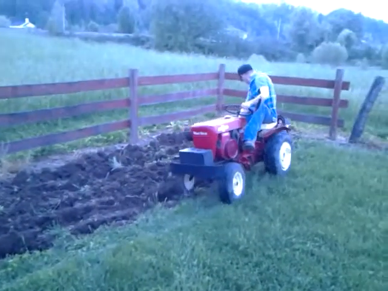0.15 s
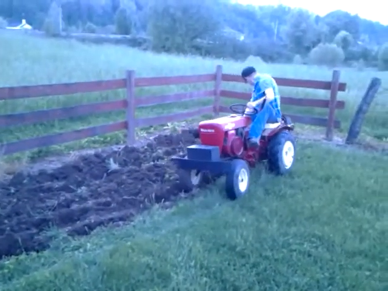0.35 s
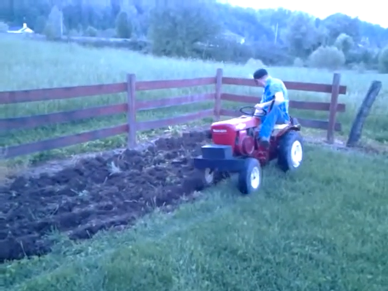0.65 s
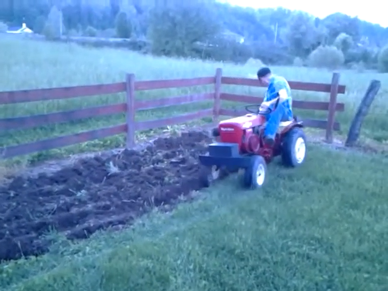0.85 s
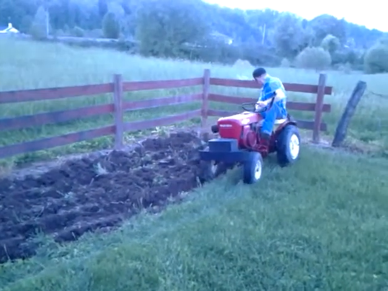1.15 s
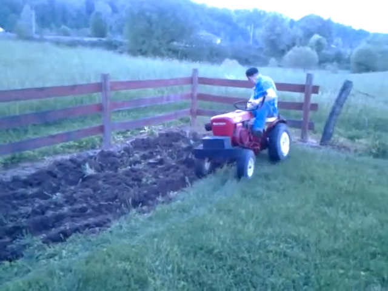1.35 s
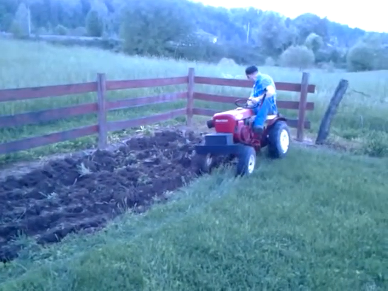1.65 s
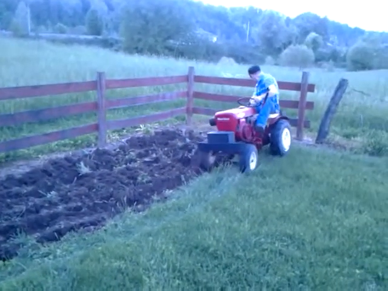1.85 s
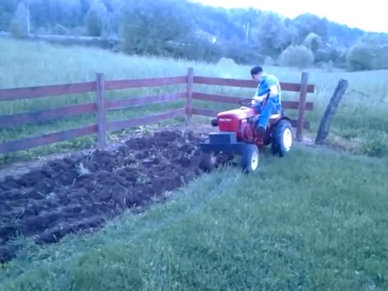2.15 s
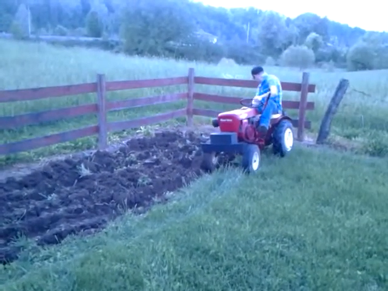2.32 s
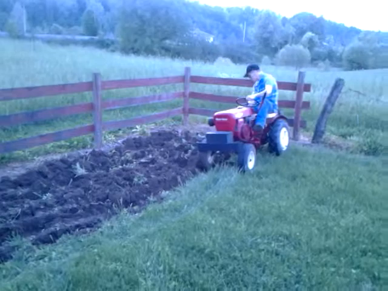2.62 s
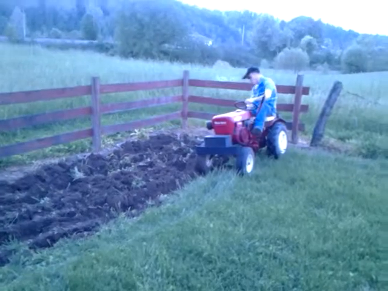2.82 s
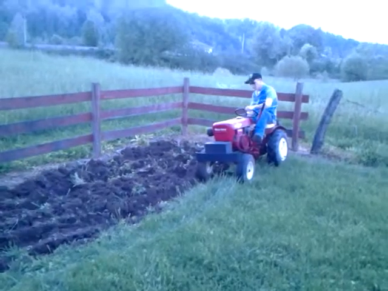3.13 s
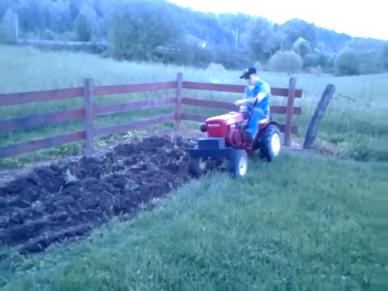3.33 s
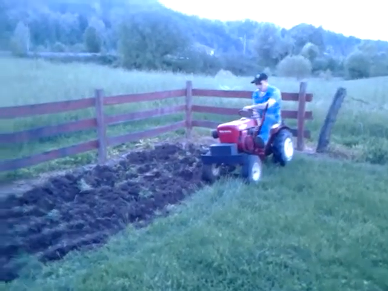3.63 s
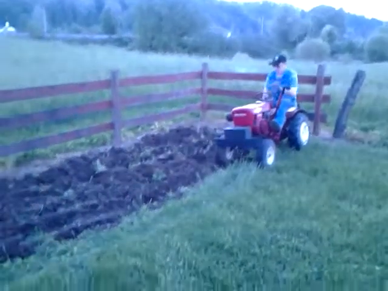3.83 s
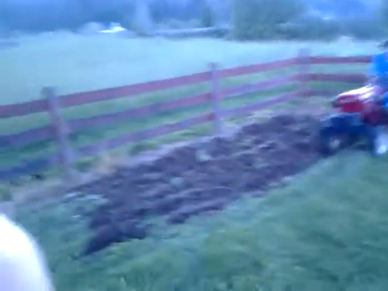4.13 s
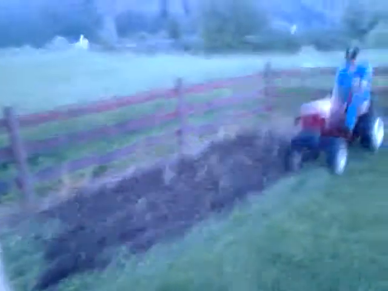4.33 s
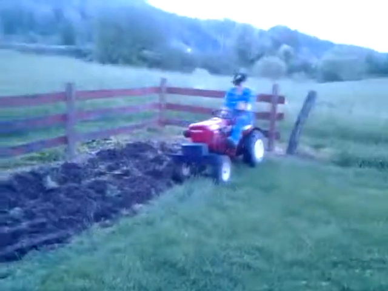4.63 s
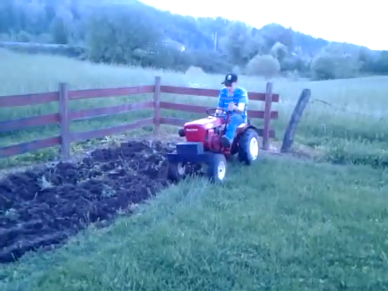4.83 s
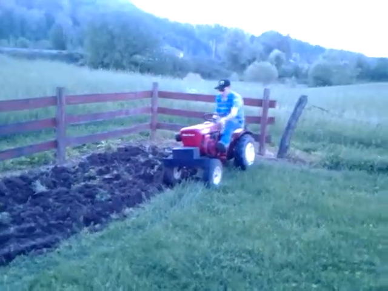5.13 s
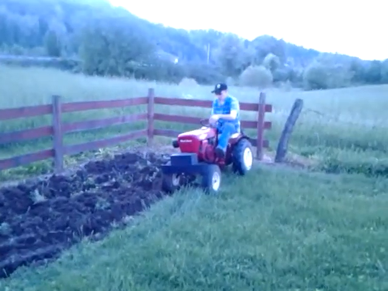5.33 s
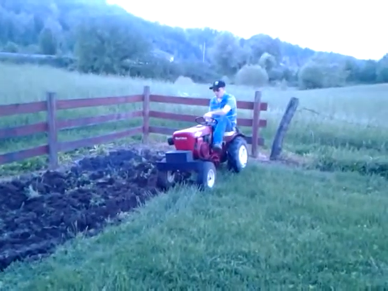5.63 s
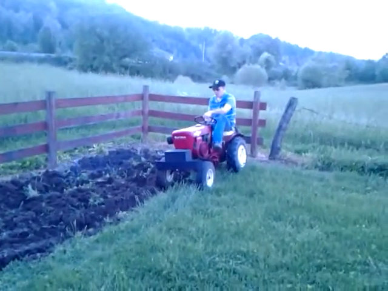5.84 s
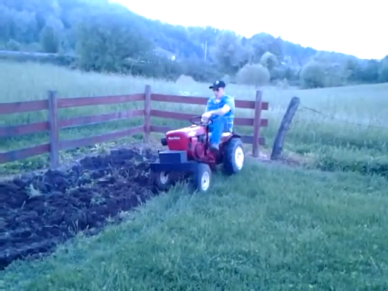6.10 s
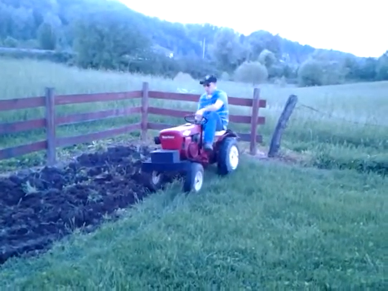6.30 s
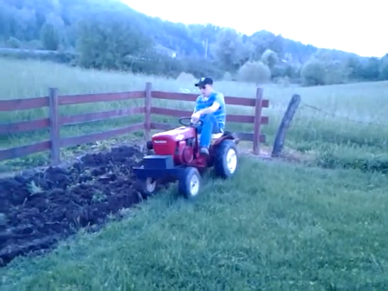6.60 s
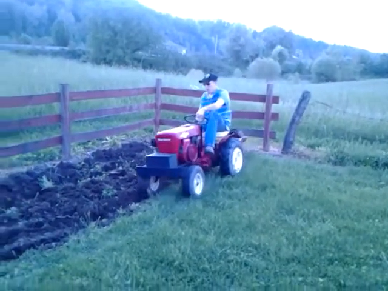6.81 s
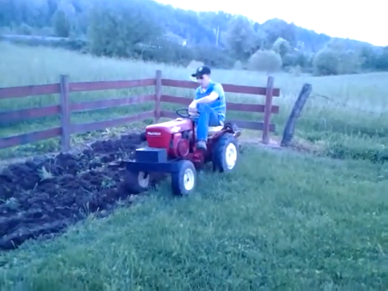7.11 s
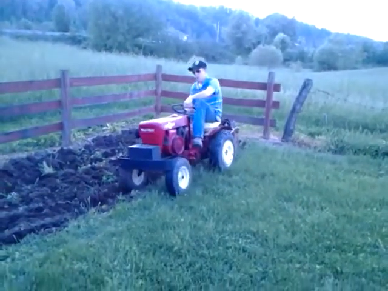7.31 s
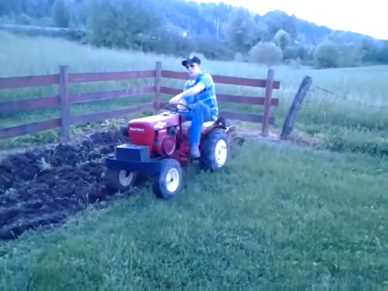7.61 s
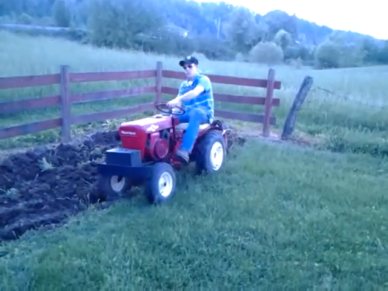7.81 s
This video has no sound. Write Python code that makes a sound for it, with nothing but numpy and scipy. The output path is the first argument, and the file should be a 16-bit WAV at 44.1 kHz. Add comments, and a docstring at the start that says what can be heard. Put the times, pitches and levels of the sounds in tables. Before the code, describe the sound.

Harsh rapid exhaust puffs and gear clatter from a small tractor outdoors; midway the tone is cupped, dips, surges once and drops to faint chugging.

```python
"""Small tractor at the plow

A small single-cylinder tractor works a plow in a field, some metres from a hand-held microphone.
Each firing rings the pipe in a low thump and sends two sharp noise puffs through the muffler outlet.
Hood and gears clatter as small random knocks on resonances, with noise hiss and crank-locked tones.
Midway a hand cups the microphone, heard as a moving filter; then the load comes off and the machine
grows much quieter. Low noise makes the wind, and a few damped rings the stray knocks."""
import sys
import numpy as np
from scipy import signal
from scipy.fft import rfft, irfft
from scipy.io import wavfile
from scipy.ndimage import uniform_filter1d

SR = 44100
rng = np.random.default_rng(int(sys.argv[2]) if len(sys.argv) > 2 else 0)


def output_pcm(signal):
    """Save a mono or channel-first signal as 16-bit PCM at the path in sys.argv[1].

    Samples are clipped to [-1, 1] before scaling.
    """
    pcm = np.clip(np.atleast_2d(signal).T, -1, 1) * 32767
    wavfile.write(sys.argv[1], SR, np.round(pcm).astype(np.int16))


def rack_gain(trim_db):
    """Turn a fader trim in dB into the linear factor to multiply a signal by."""
    fader = np.asarray(trim_db, float)
    return 10 ** (fader / 20)


N = 351036

# Engine speed. Each row: time in seconds, firings a second.
ENGINE_SPEED = [(0.0, 25.423), (0.75, 25.51), (1.0, 25.372), (1.75, 25.748), (2.25, 26.365), (3.25, 25.792),
                (3.5, 26.285), (3.75, 25.902), (4.0, 26.073), (4.5, 25.456), (5.125, 23.363),
                (5.375, 23.526), (5.625, 26.975), (5.875, 28.664), (6.0, 27.521), (6.75, 28.346),
                (7.5, 27.605), (7.96, 28.148)]


def evened(x):
    """Scales to rms 1."""
    return x / np.sqrt(np.mean(x ** 2) + 1e-20)


def curve(rows, column):
    """One column of a table, sample by sample."""
    table = np.array(rows)
    return np.interp(np.arange(N) / SR, table[:, 0], table[:, column])


def ramp(start, end):
    """Goes from 0 to 1 between two times in seconds."""
    return np.clip((np.arange(N) / SR - start) / (end - start), 0, 1)


def bump(s, half):
    """Bell of height 1 round a time, down to 1/e half seconds away."""
    return np.exp(-((np.arange(N) / SR - s) / half) ** 2)


def wander():
    """Slow random drift in dB, new at every call, so that no layer stays quite even."""
    wander_db, wander_s = 1.04, 0.052  # rms drift, first smoothing length
    smooth = uniform_filter1d(rng.standard_normal(N), round(wander_s * SR))
    return wander_db * evened(uniform_filter1d(smooth, 2000))


def resonate(x, hz, width):
    """Band-pass of gain 1 at its centre."""
    return signal.lfilter(*signal.iirpeak(hz, hz / width, SR), x)


def coloured(points):
    """Noise of rms 1 with the spectrum given as (Hz, dB) points."""
    f, db = np.transpose(points)
    hz = np.fft.rfftfreq(N, 1 / SR)
    gain = rack_gain(np.interp(np.log(hz + 1), np.log(f), db))
    return evened(irfft(rfft(rng.standard_normal(N)) * gain, N))


def burst(since, rise, fall):
    """Envelope that rises and dies away after each firing (time constants in seconds)."""
    return (1 - np.exp(-since / rise)) * np.exp(-since / fall)


def jet(since, start, length):
    """Envelope of one jet: opens fast, swells, and is cut off as the pressure falls."""
    share = np.clip((since - start) / length, 0, 1)
    return np.sin(np.pi * share ** .45) ** 1.5


def ring(at, modes, lead_s, back_s, back_db, spread_db):
    """A pressure pulse runs ahead of each firing's puff, rings the modes and returns once as an echo."""
    t, blows = np.arange(8000) / SR, np.zeros(N)
    blows[at - round(lead_s * SR)] = rack_gain(spread_db * rng.standard_normal(len(at)))
    tone = sum(rack_gain(db - 60 * t / t60) * np.sin(2 * np.pi * hz * t) for hz, db, t60 in modes)
    back = round(back_s * SR)
    tone[back:] += rack_gain(back_db) * tone[:-back]
    return evened(signal.oaconvolve(blows, tone)[:N])


def rattle(modes, since, shake, fall, knocks_per_s, spread_db):
    """Many small random knocks ring the metal, hardest just after a firing."""
    strength = rack_gain(spread_db * np.minimum(rng.exponential(1, N), 4))
    hits = (rng.random(N) < knocks_per_s / SR) * strength * rng.standard_normal(N)
    shaken = hits * (1 + shake * burst(since, 0.00022, fall))
    return evened(sum(rack_gain(db) * evened(resonate(shaken, hz, width)) for hz, width, db in modes))


def firings():
    """The turning engine: sample of each firing, and for every sample its firing and seconds since."""
    first_turn = .7823  # share of a firing period before the first firing
    number = np.floor(np.cumsum(curve(ENGINE_SPEED, column=1)) / SR + 1 - first_turn).astype(int)
    at = np.r_[0, np.flatnonzero(np.diff(number)) + 1]
    since = (np.arange(N) - at[number]) / SR
    since += (number == 0) * (1 - first_turn) / ENGINE_SPEED[0][1]  # the sound starts within a period
    return at[1:], number, since


def exhaust_thump(at, sag):
    """Each firing's pressure pulse rings the exhaust pipe and muffler shell over a low noise wash."""
    # Pipe and muffler shell. Each row: pitch in Hz, level in dB, t60 in seconds.
    pipe = [(149.5, -3.5, 0.059), (228, 6, 0.045), (292, -4, 0.096), (380, 2, 0.053)]
    # Two further notes rung by each firing, a low one and one near 530 Hz. Each row: pitch in Hz, level in dB,
    # t60 in seconds.
    outer = [(100, 0, 0.05), (532, -8, .06)]
    # Low engine wash. Each row: frequency in Hz, density in dB per Hz.
    wash = [(80, -16), (110, -9), (150, -5), (250, 0), (390, -2), (470, -9), (600, -20)]
    outer_db = -6 - 25 * ramp(5.1, 5.15)  # the outer notes drop back as the load comes off
    wash_db = -7.5 + 8 * sag  # the wash grows as the engine sags
    thump = ring(at, pipe, 0.0016, 0.01082, -12.5, 0.46)
    thump += rack_gain(outer_db) * ring(at, outer, 0.004, 0.013, -30, 1)
    # the muffler holds back the upper pipe tones
    thump = signal.sosfilt(signal.butter(3, 430, fs=SR, output="sos"), thump)
    return evened(thump + rack_gain(wash_db) * coloured(wash))


def muffler_puffs(number, since, free):
    """Two jets of gas a firing and a longer hiss; every jet excites the outlet resonances differently."""
    # Muffler outlet. Each row: centre in Hz, resonator width in Hz, dB under load, dB running free.
    outlet = [(3030, 910, -5, -37.5), (3734, 640, 4, 1.5), (4500, 1120, -7, 0), (5500, 340, -11.5, -40),
              (7000, 1170, 0.5, 0.5), (8170, 2600, -12, -5.5), (10040, 1830, -1.5, -4.5),
              (12700, 2200, -7.5, -1.5), (15000, 3000, -40, -2)]
    # Brightness of the puffs. Each row: time in seconds, tilt in dB an octave.
    tilt = [(0, -0.5), (1.2, 1), (3, 3.5), (3.6, -3.5), (4.7, 3), (5.3, 10), (6.2, -0.5), (7.96, 4)]
    firing_count = number[-1] + 1
    chance = np.clip(rng.standard_normal((firing_count, 2, len(outlet) + 1)), -1.6, 1.6)
    size = rack_gain(1.3 * chance[:, :, :1] + 3.1 * chance[:, :, 1:])  # whole jet, then each band
    second_s = .0074 + .0004 * rng.standard_normal(firing_count)[number]
    first = jet(since, 0, .0058)
    second = rack_gain(-0.82) * jet(since, second_s, 0.0049)
    # hiss trails longer running free, and ducks between the cracking jets as the engine picks up
    tail_db = -3.5 + 2.5 * free - 6.5 * bump(5.48, 0.23)
    tail = rack_gain(tail_db) * (burst(since, 0.0077, 0.016) + 0.041)
    brightness_db = curve(tilt, column=1) + 2 * wander()
    top_hz = 11300  # the tilt grows no further above this
    out = np.zeros(N)
    for k, (hz, width, load_db, free_db) in enumerate(outlet):
        envelope = first * size[number, 0, k] + second * size[number, 1, k] + tail * (hz / 7000) ** -.35
        jets = envelope * rng.standard_normal(N)
        rung = resonate(resonate(jets, hz, width), hz, width)  # twice: dark valleys between the bands
        band_db = load_db + free * (free_db - load_db) + brightness_db * np.log2(min(hz, top_hz) / 7000)
        out += rack_gain(band_db) * evened(rung)
    wide = (first + second + tail) * coloured([(450, -23), (900, -15), (2000, -22), (16000, -9)])
    return evened(evened(out) + rack_gain(-9.0 - 3 * free) * evened(wide))  # less broad noise running free


def crank_tones(waver_db):
    """Sines locked to the crank, each swelling and fading on its own."""
    # Tones of the turning engine in the hood. Each row: multiple of the firing rate, level in dB.
    multiples = [(21, -8.5), (23, -1), (24, 4.5), (26, -9), (27, -27), (29, 2), (30, -23), (31, -0.5),
                 (33, 0.5), (34, -3), (36, -11), (37, 2), (38, 3), (40, -10), (41, -6)]
    turns, out = np.cumsum(curve(ENGINE_SPEED, column=1)) / SR, np.zeros(N)
    for multiple, db in multiples:
        waver = np.interp(np.arange(N), np.linspace(0, N, 40), rng.standard_normal(40))
        out += rack_gain(db + waver_db * waver) * np.sin(2 * np.pi * (multiple * turns + rng.random()))
    return evened(out)


def hood_clatter(at, since, sag, free):
    """Firings knock the shell and shake loose panels, and the turning crank hums in the sheet metal."""
    # Shell struck by each firing. Each row: pitch in Hz, level in dB, t60 in seconds.
    shell = [(664, -10.5, 0.055), (846, 2, .014), (1070, -19, 0.0037)]
    # Loose hood panels. Each row: centre in Hz, width in Hz, level in dB.
    panels = [(674, 28, -2), (766, 51, 8.5), (875, 45, 9.5), (990, 33, -1.5), (955, 98, -22)]
    hood = rack_gain(3 * free + 3 * sag) * ring(at, shell, 0.001603, 0.01, -0.95, 1.75)
    hood += rack_gain(2) * rattle(panels, since, 0.48, 0.02, 1500, 0.55)
    # the panels radiate little bass
    hood = signal.sosfilt(signal.butter(4, 560, "high", fs=SR, output="sos"), hood)
    # the tones give way to knocks as the speed sags, and stay weak running free
    hood += rack_gain(-10 * sag - 6 * free) * crank_tones(3.7)
    return evened(hood)


def firing_beat(since):
    """Lift of the gear and drive hiss by each firing."""
    return 1 + 0.57 * burst(since, 0.00076, 0.006)


def gear_clatter(since, sag, free):
    """Teeth knock in the gear case over hiss, in separate beats as the speed sags."""
    # Gear case. Each row: centre in Hz, width in Hz, level in dB.
    case = [(1072, 540, 6.5), (1352, 69, 2), (1620, 110, -1.5), (1791, 46, 10), (2090, 78, -1.5),
            (2434, 105, 11), (2450, 130, -15)]
    # Hiss of the gear case. Each row: frequency in Hz, density in dB per Hz.
    case_hiss = [(300, -91), (600, -7.5), (1500, 4.5), (2600, 5.5), (3300, -17), (8000, -53), (16000, -17)]
    gears = rattle(case, since, 0.91, 0.015, 3000, 2.85)
    gears += rack_gain(-1.5) * firing_beat(since) * coloured(case_hiss)
    gears += free * rack_gain(0.67) * resonate(gears, 1460, 400)  # the case rings lower running free
    return evened(gears * (1 + 1.97 * sag * burst(since, 0.0015, 0.0097)))


def drive_grind(since):
    """Bright grinding of the drive: dense knocks on high resonances over hiss."""
    # Drive resonances. Each row: centre in Hz, width in Hz, level in dB.
    drive_modes = [(3080, 470, -4.5), (3430, 180, 1.5), (3620, 99, -2), (4440, 48, -2.5), (4770, 81, -2),
                   (5274, 470, -0.5), (6000, 65, -4.5), (6950, 3200, -1)]
    # Hiss of the drive. Each row: frequency in Hz, density in dB per Hz.
    drive_hiss = [(600, -20), (1500, -12.5), (4000, -7.5), (8000, -21.5), (12000, -15.5), (16000, -26)]
    drive = rattle(drive_modes, since, 1.0, 0.0049, 4000, 2.9)
    return evened(drive + rack_gain(-3.0) * firing_beat(since) * coloured(drive_hiss))


def wind():
    """Air turbulence at the microphone: low noise with gusts and slow random drift."""
    # Wind in the lulls. Each row: time in seconds, level in dB.
    lulls = [(0, -62), (2.5, -64), (4.3, -75), (5.6, -63), (6.3, -77), (7.96, -78)]
    # Gusts. Each row: time in seconds, dB over the lull.
    gusts = [(.1, 8), (.4, 10), (.93, 6), (2.28, 6), (2.64, 8), (3.04, 8), (3.81, 8), (5.61, 7), (6.94, 12)]
    drift_db = 2.4 * evened(uniform_filter1d(rng.standard_normal(N), 3500))
    gust_db = sum(db * bump(s, .09) for s, db in gusts)
    rumble = coloured([(15, -4), (30, 4), (75, 4), (130, 1), (200, -39)])
    return rack_gain(curve(lulls, column=1) + gust_db + drift_db) * rumble


def cupped_hand(x):
    """The hand's cavity lifts one moving band, shades the treble above it and alters the very top."""
    # Hand over the microphone. Each row: time in seconds, cavity in Hz, cavity lift in dB,
    # shadow above it in dB, highest treble in dB.
    hand = [(3.0, 7940, 0, -10, 10.5), (3.2, 7000, 6.5, -6, 2), (3.4, 5500, 9.5, -11, 4),
            (3.55, 4500, 5.5, -16, -0.5), (3.9, 5750, 6.5, -4, 4), (4.1, 5350, 7, 1, 0),
            (4.55, 5500, 8, -5.5, -6), (4.8, 4060, 9, -14.5, -2), (4.95, 4500, 12.5, -8.5, -4),
            (5.1, 4060, 7.5, -10, -4), (5.35, 4500, 2, -14.5, -8.5), (5.85, 4500, 2, -15, 0)]
    top_hz = 11300  # where the highest treble starts
    hz, t, z = signal.stft(x, SR, nperseg=512, noverlap=384)
    s, *columns = np.transpose(hand)
    cavity_hz, lift_db, shadow_db, top_db = (np.interp(t, s, c) for c in columns)
    near = np.clip(np.minimum(t - s[0], s[-1] - t) / .15 + 1, 0, 1)  # the hand comes and goes
    octaves = np.log2((hz[:, None] + 1) / cavity_hz)
    gain_db = lift_db * np.exp(-(octaves / 0.44) ** 2)
    gain_db += shadow_db * np.exp(-((octaves - .85) / 0.75) ** 2)
    gain_db += top_db * np.clip(np.log2((hz[:, None] + 1) / top_hz) / 0.19 + .5, 0, 1)
    return signal.istft(z * rack_gain(near * gain_db), SR, nperseg=512, noverlap=384)[1][:, :N]


def stray_knocks():
    """Knocks near the microphone, each one quickly damped ring."""
    # Each row: start in seconds, starting level in dB, pitch in Hz, t60 in seconds.
    strays = [(3.558, -1, 3770, 0.011), (3.751, -2, 5560, 0.016), (4.645, -3.5, 5200, 0.0093),
              (6.915, -36, 232, .06), (7.447, -30, 2900, 0.003), (7.827, -31, 2500, 0.004)]
    out, t = np.zeros(N), np.arange(4000) / SR
    for s, db, hz, t60 in strays:
        out[round(s * SR):][:len(t)] += rack_gain(db - 60 * t / t60) * np.sin(2 * np.pi * hz * t)
    return out


def scene():
    """Exhaust, hood, gears and drive follow the levels, the load and the engine speed."""
    # Levels at the microphone. Each row: time in seconds, engine body in dB, muffler puffs in dB,
    # bright grinding of the drive in dB, gear clatter in dB over the body.
    work = [(0, -27.5, -18, -36, 3.5), (.4, -27, -19.5, -27, 5.5), (1.1, -26, -17, -35, 2.5),
            (1.6, -29, -18.5, -33, 3.5), (2, -26, -18, -31, 0.5), (2.8, -23.5, -19, -24, 1.5),
            (3.2, -24.5, -21, -23.5, 1.5), (3.7, -24, -21, -18, -0.5), (4.2, -25, -28.5, -21, 0.5),
            (4.6, -22, -19.5, -21, 0.5), (4.72, -25.5, -33, -26.5, 0.5), (4.84, -25, -47, -39.5, -6),
            (4.93, -25, -30, -21, 2), (5.05, -26, -37, -46.5, -8.5), (5.2, -29.5, -46, -43, -18),
            (5.3, -34, -28, -66, -12), (5.38, -38.5, -30, -66, -12), (5.46, -27, -20.5, -60, -10.5),
            (5.6, -22.5, -20, -55, -8.5), (5.75, -32.5, -31, -59, -8.5), (6, -40, -44, -69, -7.5),
            (6.9, -43, -47, -56, -9.5), (7.3, -48, -45, -60, -6.5), (7.96, -49, -43.5, -57, -7)]
    # Exhaust thump. Each row: time in seconds, dB over the body.
    thump_levels = [(0, -10), (2.4, -8.5), (4.6, -11.5), (5.12, -8.5), (5.42, -5), (6, -1.5), (7.5, 0),
                    (7.96, 1)]
    at, number, since = firings()
    free = ramp(4.3, 5.3)  # the load comes off the engine
    sag = np.clip((25.35 - curve(ENGINE_SPEED, column=1)) / .5, 0, 1)  # full half a firing a second below
    body_db = curve(work, column=1)
    thump_gain = rack_gain(body_db + curve(thump_levels, column=1) + wander())
    gear_gain = rack_gain(body_db + curve(work, column=4) + wander())
    hood_gain, puff_gain, grind_gain = (rack_gain(curve(work, column=k) + wander()) for k in (1, 2, 3))
    mix = thump_gain * exhaust_thump(at, sag)
    mix += puff_gain * muffler_puffs(number, since, free)
    mix += hood_gain * hood_clatter(at, since, sag, free)
    mix += gear_gain * gear_clatter(since, sag, free)
    mix += grind_gain * drive_grind(since)
    return (mix + stray_knocks())[None]


def low_pass(x):
    """Removes everything above the highest recorded frequency."""
    return signal.sosfilt(signal.butter(12, 16970, fs=SR, output="sos"), x)


def record(dry):
    """A hand cups the microphone, which cuts bass, picks up wind, rounds peaks and ends near 16 kHz."""
    cupped = cupped_hand(dry)
    thin = signal.sosfilt(signal.butter(7, 148, "high", fs=SR, output="sos"), cupped)
    windy = thin + wind()
    limited = .95 * np.tanh(windy / .95)  # the input stage rounds the loudest puffs
    banded = signal.oaconvolve(limited, signal.firwin(255, 15850, fs=SR)[None], "same")
    return low_pass(banded)


dry = scene()
out = record(dry)
output_pcm(out)
```